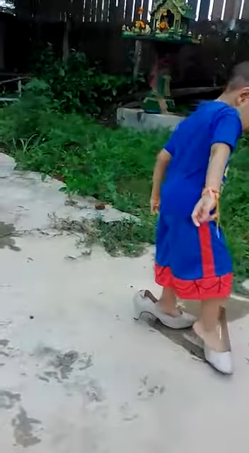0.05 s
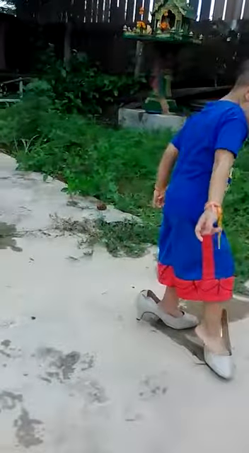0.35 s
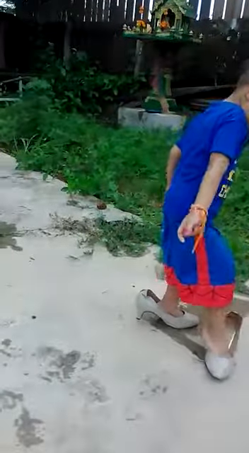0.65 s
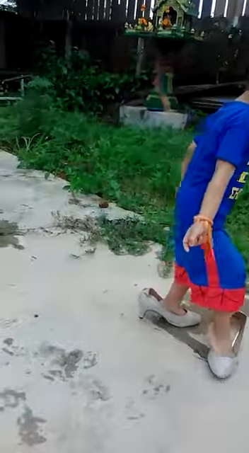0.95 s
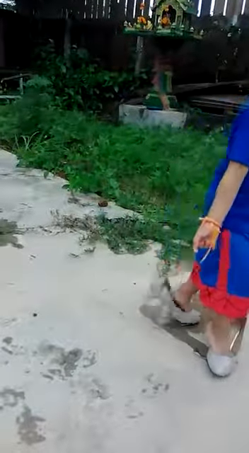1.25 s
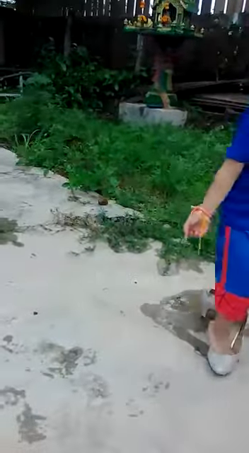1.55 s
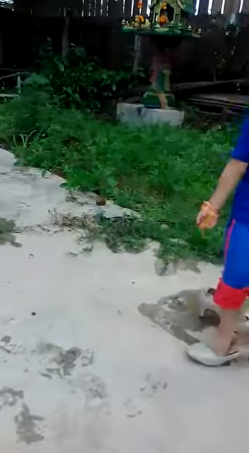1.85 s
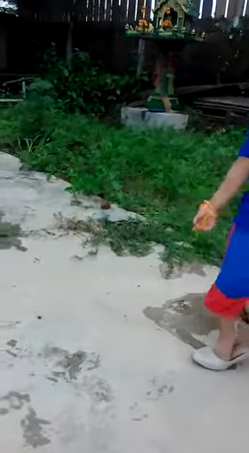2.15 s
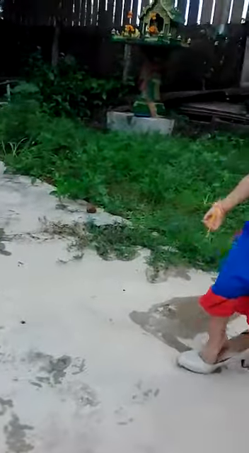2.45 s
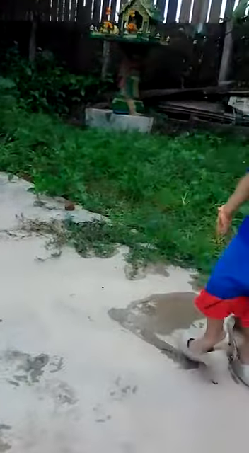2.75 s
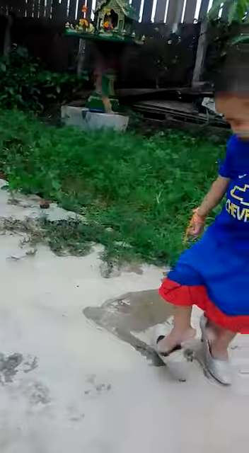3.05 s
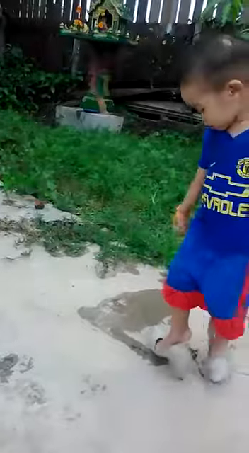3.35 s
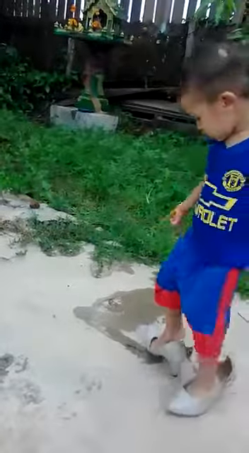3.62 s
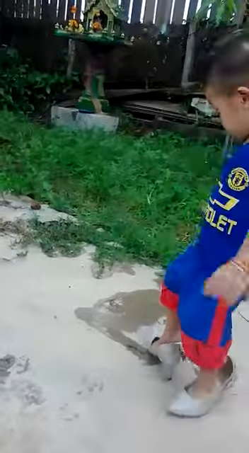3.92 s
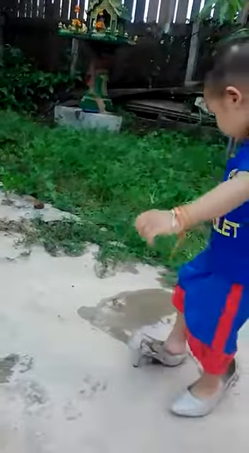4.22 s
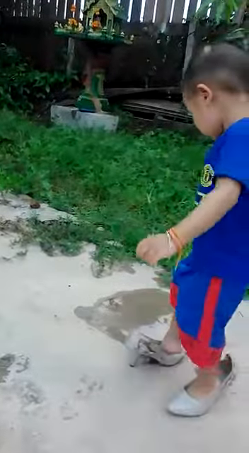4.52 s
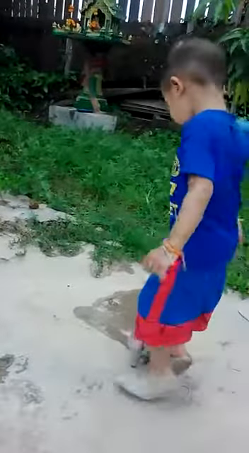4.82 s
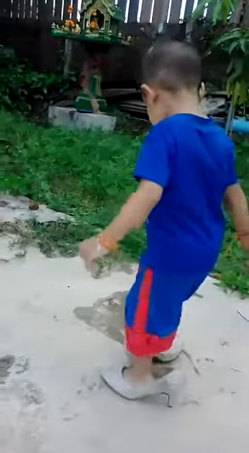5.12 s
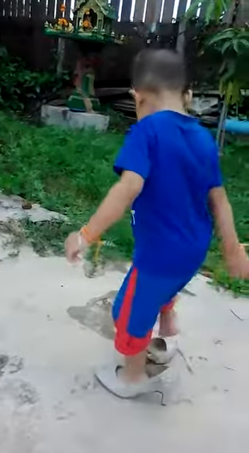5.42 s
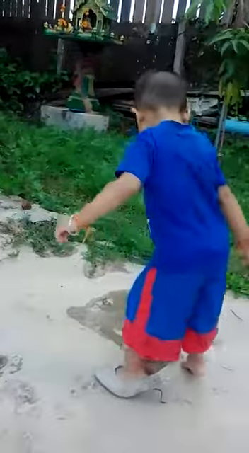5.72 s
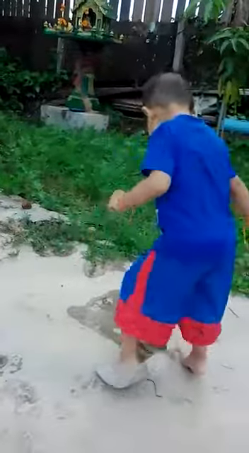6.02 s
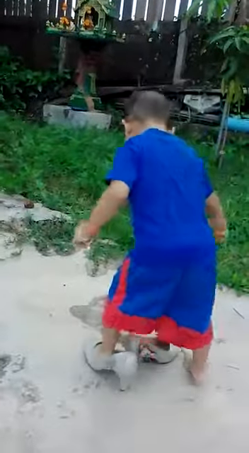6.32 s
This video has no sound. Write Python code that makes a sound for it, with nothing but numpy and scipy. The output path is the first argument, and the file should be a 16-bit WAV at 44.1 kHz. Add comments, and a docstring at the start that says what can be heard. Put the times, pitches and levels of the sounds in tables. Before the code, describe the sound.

A small child shuffles across a concrete yard in oversized high heels. Five sharp single clacks come at uneven gaps, the first two and the last loudest, each with a small rattle of the loose shoe and a brief echo off walls. Between steps the soles scrape softly over grit. Midway a finger bumps the microphone with dull thuds. Faint swishes and a low outdoor rumble lie underneath.

```python
"""Child in oversized high heels

A small child shuffles over a concrete yard. Each heel strike makes the shoe ring with a hard clack,
the loose shoe rattles after it, and walls answer briefly. Between steps the sole grinds over grit
and once squeals faintly as it twists. A small metal trinket tinks and a hand bumps the microphone.
Soft swishes and a low outdoor rumble lie underneath."""
import sys
import numpy as np
from scipy import signal
from scipy.fft import rfft, irfft, next_fast_len
from scipy.io import wavfile
from scipy.ndimage import uniform_filter1d, map_coordinates

SR = 44100
rng = np.random.default_rng(int(sys.argv[2]) if len(sys.argv) > 2 else 0)


def wrap_up_sound(samples):
    """Save the sound to the file named by the first command line argument, as 16-bit audio."""
    columns = np.atleast_2d(samples).T
    # keep every value between -1 and 1, then stretch to whole-number steps
    tamed = np.clip(columns, -1, 1)
    steps = np.round(tamed * 32767).astype(np.int16)
    wavfile.write(sys.argv[1], SR, steps)


N = 289737

# how loud the distant rumble is over time: time_s, level_db
RUMBLE_LEVELS = [(0.0, -52.5), (0.69, -56), (2.47, -52.5), (2.93, -54.5), (3.66, -55.5), (3.95, -51.5),
                 (4.34, -55), (4.65, -58), (6.57, -59.5)]
# the tone of the rumble, the air and the swishes: frequency_hz, level_db
RUMBLE_TONE = [(20, -38.5), (45, -19.5), (75, -8), (135, 3.5), (200, -2), (350, -5.5), (550, -15.5),
               (900, -51.5)]
AIR_TONE = [(200, -3), (500, -1), (800, 0), (1150, 0.5), (1600, -3), (2050, -1), (3000, -6), (4700, -7),
            (6300, -11), (8500, -13.5), (10700, -11.5), (12500, -13.5), (15800, -14)]
SWISH_TONE = [(2000, -6), (3300, -14), (4300, 1), (5000, -1), (5800, -11), (7000, -23)]
# soft high swishes between the steps: start_s, length_s, level_db
SWISHES = [(0.653, 0.14, -62.5), (0.89, 0.17, -71), (1.3, 0.32, -66.5), (1.884, 0.13, -61.5),
           (2.091, .4, -66), (3.306, 0.28, -64), (3.795, 0.285, -59), (5.551, .067, -67.5)]
# soft bumps on the microphone's case: time_s, level_db, pitch_hz
BUMPS = [(4.0144, -21, 249), (4.022, -29.5, 450), (4.029, -24, 234), (4.039, -32, 151), (4.094, -28, 189),
         (4.155, -43, 129), (4.5147, -35.5, 209)]
# touches on the trinket: start_s, ring_db, tick_db
TINKS = [(0.2684, -56.5, -53.5), (5.419, -57, -48)]
# the notes the trinket rings with: pitch_hz, level_db, fade_s (time to fall by 60 dB)
TRINKET_NOTES = [(10550, 16, 0.041), (10820, -9.5, 0.087), (11160, 9, .025)]
# the tone of the trinket's tick: frequency_hz, level_db
TICK_TONE = [(2500, -42), (4300, 5), (6500, -11), (9000, -4.5), (11000, -19), (15000, -10)]
# the squeal of the twisting sole: time_s, pitch_hz, level_db
SQUEAL = [(1.27, 5660, -89), (1.33, 5650, -66), (1.42, 5480, -74), (1.5, 5100, -60), (1.59, 5000, -70)]
# the shoe dragged over concrete: start_s, length_s, level_db, pitch_hz
DRAGS = [(0.167, 0.12, -54.5, 2580), (1.747, .13, -50.5, 2870), (2.74, 0.11, -58.5, 3420),
         (3.067, 0.05, -56, 3700), (4.18, 0.088, -56.5, 1240), (4.235, 0.11, -50.5, 4660),
         (4.607, 0.057, -58.5, 1750), (4.702, 0.085, -58, 4900), (6.091, 0.071, -56, 4700)]
# large grains that snap under the sole: start_s, level_db, pitch_hz
GRAINS = [(1.7779, -43, 4380), (1.8115, -32.5, 3800), (1.8616, -44.5, 5030), (2.5172, -44, 3480),
          (2.7492, -42.5, 5240), (2.7634, -43, 3000), (4.3063, -40.5, 3870), (4.3411, -41, 5800),
          (4.7045, -45.5, 5070)]
# the tone of grit scraped by the sole, and crushed by the heel: frequency_hz, level_db
SCRAPE_TONE = [(200, -14), (480, 6), (720, -2.5), (1100, 4), (1600, -5.5), (2600, 0), (3600, -6),
               (4900, -1), (6800, -12), (15000, -24)]
CRACK_TONE = [(200, -13), (800, 6.5), (1500, 2), (2700, 1), (3300, -4), (4600, -3), (6200, -11.5),
              (7200, -20), (11000, -27), (16000, -30.5)]
# how long the walls' echo lasts: frequency_hz, fade_s
ECHO_FADES = [(200, 0.5), (1200, 0.54), (2500, 0.43), (5000, 0.5), (12000, 0.53)]
# the tone of that echo: frequency_hz, level_db
ECHO_TONE = [(100, -25), (250, -5.5), (450, 1), (750, -7), (1250, 2), (2300, -2.5), (3200, -17),
             (4600, -15), (7000, -29.5), (14000, -35)]
# the notes a struck shoe rings with: pitch_hz, level_db, fade_s
SHOE_NOTES = [(257.1, -13, 0.02), (432, -1.5, 0.0078), (940, -20.5, 0.002), (1224, 2.5, 0.0033),
              (1480, -11.5, 0.0026), (1907, 1.5, 0.0024), (2184, 6, 0.0036), (2600, -9.5, 0.0053)]
# those notes form three bands, a low knock, a middle clack and a high snap: low_hz, high_hz
SHOE_BANDS = [(250, 700), (700, 1650), (1650, 3000)]
# heel strikes, where flex multiplies the shoe's pitch as it bends:
# start_s, clack_db, knock_over_clack_db, flex, crack_db, crack_hz
STEPS = [(1.5986, -10, -8, 1.012, -29.5, 4570), (2.4206, -11.5, -22, 1.022, -23.5, 3800),
         (3.6875, -26.5, -0.5, 0.992, -29, 4540), (5.014, -20, -8.5, 1.055, -26.5, 4800),
         (6.2982, -12, -6, 1.04, -23, 4900)]
# the loose shoe flops against the ground: start_s, level_db, hardness_db
FLOPS = [(1.614, -28.5, -1.5), (2.416, -45, 8.5), (2.4473, -39.5, 13), (2.73, -42, -5), (3.717, -39.5, 9),
         (3.724, -41, 10), (5.0607, -39.5, -6), (5.1377, -43.5, -7), (6.3323, -34, -19), (6.3486, -65, 3)]

SLIPS_PER_S, SLIP_FADE_DB, SLIP_SCATTER_DB = 67, 9.5, 3  # a dragged sole sticks and slips
FIRM_CLACK_DB, FIRM_SNAP_DB, SNAP_GROWTH = -12.5, -23, 0.33  # snap gains 0.33 dB per dB of clack
FLOP_FLEX = 0.81  # with no weight on it the shoe rings lower
TOP_HZ = 15850


def amp(db):
    """Turn decibels into a gain."""
    return 10 ** (np.asarray(db) / 20)


def unit(x):
    """Scale x to an average (rms) level of 1."""
    return x / np.sqrt(np.mean(x ** 2) + 1e-20)


def along(points, hz):
    """Read between (frequency, value) points on a log frequency axis."""
    frequencies, values = np.transpose(points)
    return np.interp(np.log(hz + 1), np.log(frequencies + 1), values)


def curves(rows):
    """One value per sample for each column after the time."""
    times, *columns = np.transpose(rows)
    return [np.interp(np.arange(N) / SR, times, column) for column in columns]


def wobble(rate):
    """A smooth curve through `rate` random points a second."""
    return map_coordinates(rng.standard_normal(int(N * rate / SR) + 4), [np.arange(N) * rate / SR])


def filtered(x, gain):
    """Apply a gain that depends on frequency."""
    size = next_fast_len(len(x) + 8192)
    return irfft(rfft(x, size) * gain(np.fft.rfftfreq(size, 1 / SR)), size)[:len(x)]


def coloured(x, tone):
    """Shape x with a tone table, at level 1."""
    return unit(filtered(x, lambda hz: amp(along(tone, hz))))


def resonant(x, hz, boost_db, q):
    """Lift one pitch out of x, at level 1; a higher q makes the peak narrower."""
    return unit(filtered(x, lambda f: 1 + amp(boost_db) / (1 + 1j * q * (f / hz - hz / (f + 1)))))


def rush(tone, patchy_db):
    """Noise at level 1 with random louder and softer patches in time and pitch."""
    bands = signal.stft(rng.standard_normal(N), nperseg=512)[2]
    patches = uniform_filter1d(rng.standard_normal(bands.shape), size=7, axis=0)
    patches = unit(uniform_filter1d(patches, size=18, axis=1))
    return coloured(signal.istft(bands * amp(patchy_db * patches), nperseg=512)[1][:N], tone)


def press(t, rise_s, hold_s, fade_s):
    """The loudness of one contact: it bites, holds for a moment and lets go."""
    return np.minimum(t / rise_s, 1) ** 2 * amp(-60 * np.maximum(t - hold_s, 0) / fade_s)


def add(track, start_s, sound):
    """Mix a sound into the track from start_s on."""
    start = max(round(start_s * SR), 0)
    part = sound[:max(N - start, 0)]
    track[start:start + len(part)] += part


def yard():
    """Distant rumble with a wavering low drone, and thin air noise that slowly eases."""
    rumble_db, = curves(RUMBLE_LEVELS)
    t = np.arange(N) / SR
    drone = wobble(22) * np.sin(2 * np.pi * 135 * t)
    rumble = amp(rumble_db - 0.5) * (rush(RUMBLE_TONE, patchy_db=0.65) + amp(-8.5) * drone)
    air = amp(-61 - 0.2932 * t) * rush(AIR_TONE, patchy_db=1)
    return rumble + air


def swishes():
    """Soft, narrow hiss that swells and fades as the child moves."""
    level = amp(-74.5 + 0.5 * wobble(6))  # it never quite stops
    for start_s, length_s, db in SWISHES:
        add(level, start_s, amp(db + 0.5) * signal.windows.tukey(int(length_s * SR), 0.7))
    return level * rush(SWISH_TONE, patchy_db=2.5)


def bumps():
    """A finger shifts on the microphone's case: dull thuds of one or two cycles."""
    out, t = np.zeros(N), np.arange(-SR // 40, SR // 40) / SR
    for time_s, db, hz in BUMPS:
        swell = np.exp(-(t * hz / 0.68) ** 2)
        add(out, time_s + t[0], -amp(db) * swell * np.sin(2 * np.pi * hz * t))
    return out


def trinket():
    """Light touches tick and ring a tiny piece of metal."""
    out, t = np.zeros(N), np.arange(SR // 8) / SR
    onset = 1 - np.exp(-t / 0.00051)
    for start_s, ring_db, tick_db in TINKS:
        ring = np.zeros(len(t))
        for hz, db, fade_s in TRINKET_NOTES:
            level = amp(db + rng.normal(0, 1.8) - 60 * t / fade_s)
            ring += level * np.sin(2 * np.pi * (hz * t + rng.random()))
        tick = coloured(rng.standard_normal(len(t)), TICK_TONE)
        tick *= press(t, rise_s=0.00043, hold_s=0.0028, fade_s=0.0068)
        add(out, start_s, amp(ring_db) * ring * onset + amp(tick_db) * tick)
    return out


def squeal():
    """The sole twists in place: a thin, unsteady whistle that sinks as it slows."""
    hz, db = curves(SQUEAL)
    t = np.arange(N) / SR
    phase = 2 * np.pi * np.cumsum(hz * (1 + 0.028 * wobble(650))) / SR
    twisting = (t > SQUEAL[0][0]) & (t < SQUEAL[-1][0])
    return amp(db + 3.4 * wobble(89.6)) * np.sin(phase) * twisting


def slips():
    """A gain that jumps at each slip of the sole and fades until the next."""
    count = np.cumsum(SLIPS_PER_S * np.exp(0.25 * wobble(SLIPS_PER_S))) / SR  # uneven gaps
    which = count.astype(int)
    strength_db = SLIP_SCATTER_DB * rng.standard_normal(N)[which]
    return unit(uniform_filter1d(amp(strength_db - SLIP_FADE_DB * (count - which)), size=64))


def drags():
    """The sole grinds over sand in quick slips, and a few larger grains snap."""
    out, t = np.zeros(N), np.arange(SR // 50) / SR
    rough_noise = rng.standard_normal(N) * amp(1.2 * rng.standard_normal(N))
    sand = coloured(rough_noise * slips(), SCRAPE_TONE)
    for start_s, length_s, db, hz in DRAGS:
        stroke = signal.windows.tukey(int(length_s * SR), 0.5)
        rasp = resonant(sand[int(start_s * SR):][:len(stroke)], hz, boost_db=4.5, q=3.2)
        add(out, start_s, amp(db) * stroke * rasp)
    for start_s, db, hz in GRAINS:
        snap = resonant(coloured(rng.standard_normal(len(t)), SCRAPE_TONE), hz, boost_db=10, q=7.6)
        add(out, start_s, amp(db - 4) * snap * press(t, rise_s=0.0019, hold_s=0.004, fade_s=0.0124))
    return out


def echo(first_db, tail_db):
    """Sound bounces off the ground and the child, then thinly off fence and house; new for each spot."""
    hz, t, bands = signal.stft(rng.standard_normal(SR // 2), SR, nperseg=256)
    surfaces_db = 2.2 * rng.standard_normal(len(t))  # some surfaces answer louder than others
    fade_db = 60 * t / along(ECHO_FADES, hz)[:, None]
    tail = signal.istft(bands * amp(surfaces_db - fade_db), SR, nperseg=256)[1]
    tail = coloured(tail, ECHO_TONE)
    age = np.arange(len(tail)) / SR
    near = amp(first_db - 60 * age / 0.049)
    far = amp(tail_db) * (1 - np.exp(-age / 0.01))
    return tail / np.std(tail[:SR // 20]) * (near + far) * np.minimum(age / 0.0017, 1)


def blow(x, db):
    """Give x the energy of a 4.5 ms burst at this level."""
    return amp(db) * x * np.sqrt(0.0045 * SR / np.sum(x ** 2))


def strike(flex, knock_db, clack_db, snap_db, crack_db, crack_hz):
    """One contact rings the shoe very briefly and crushes some grit; the yard answers."""
    t = np.arange(SR // 25) / SR
    tuning = flex * (1 + 0.0052 * rng.standard_normal(len(SHOE_NOTES)))
    rises_s, levels_db = (0.0021, 0.002, 0.00093), (knock_db, clack_db, snap_db)
    shoe = np.zeros(len(t))
    for (low_hz, high_hz), rise_s, band_db in zip(SHOE_BANDS, rises_s, levels_db):
        band = np.zeros(len(t))
        for k, (hz, db, fade_s) in enumerate(SHOE_NOTES):
            if low_hz <= hz < high_hz:
                # neighbouring notes swing against each other at the height of the blow
                note = (-1) ** k * np.sin(2 * np.pi * hz * tuning[k] * (t - 0.0036))
                shape = press(t, rise_s, hold_s=0.0048, fade_s=fade_s)
                band += amp(db + rng.normal(0, 0.92)) * note * shape
        shoe += blow(band, band_db)
    grit = resonant(coloured(rng.standard_normal(len(t)), CRACK_TONE), crack_hz, boost_db=2, q=5)
    # the crack is strongest at first touch
    bite = press(t, rise_s=0.0016, hold_s=0.005, fade_s=0.012) * amp(-60 * t / 0.028)
    # the bright part of the blow carries farthest
    sound = amp(0.17 * clack_db + 0.64 * snap_db) * echo(first_db=-14, tail_db=-23.5)
    sound[:len(t)] += shoe + blow(grit * bite, crack_db)
    return sound


def heels():
    """The heel comes down hard, and the oversized shoe flops around each step."""
    out = np.zeros(N)
    for start_s, clack_db, knock_over_db, flex, crack_db, crack_hz in STEPS:
        snap_db = FIRM_SNAP_DB + SNAP_GROWTH * (clack_db - FIRM_CLACK_DB)
        add(out, start_s, strike(flex, clack_db + knock_over_db, clack_db, snap_db, crack_db, crack_hz))
    for start_s, db, hardness_db in FLOPS:
        flop = strike(FLOP_FLEX, knock_db=db, clack_db=db - 1.5, snap_db=db - 11.5 + 0.67 * hardness_db,
                      crack_db=db - 8.5 + hardness_db, crack_hz=4900)
        add(out, start_s, flop)
    # the heels carry no deep bass
    return signal.sosfilt(signal.butter(2, 110, "highpass", fs=SR, output="sos"), out)


def scene():
    """Mix all the sounds into one channel."""
    return (heels() + drags() + squeal() + trinket() + swishes() + bumps() + yard())[None]


def record(dry):
    """The phone keeps nothing above TOP_HZ."""
    return np.array([filtered(x, lambda hz: hz < TOP_HZ) for x in dry])


dry = scene()
out = record(dry)
wrap_up_sound(out)
```